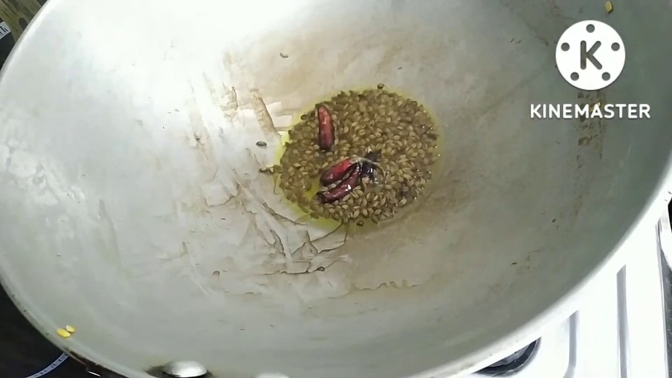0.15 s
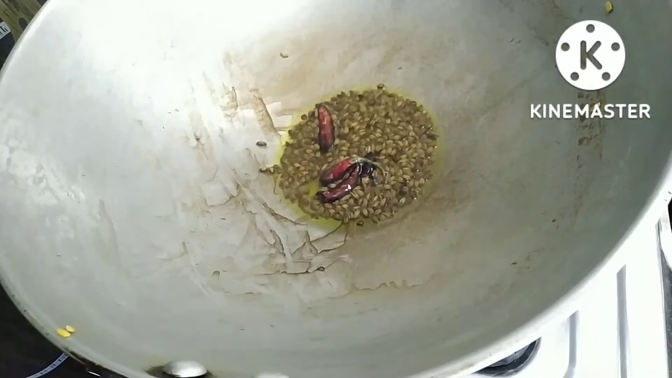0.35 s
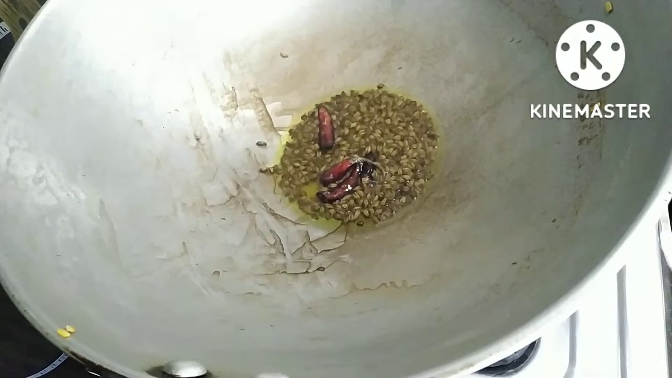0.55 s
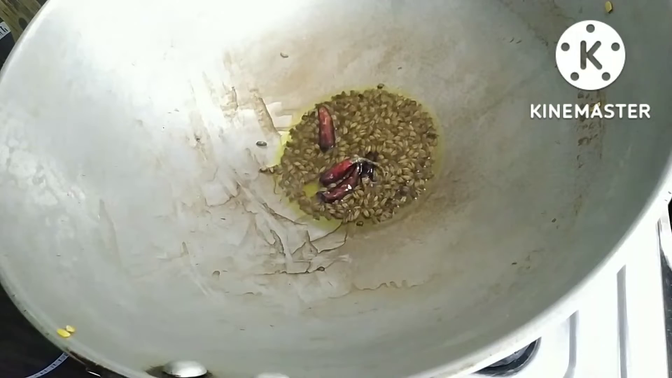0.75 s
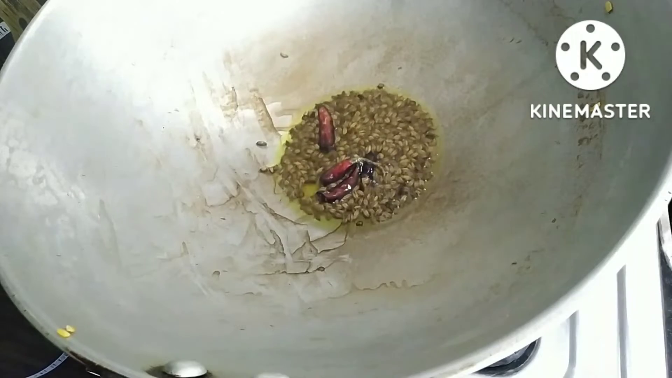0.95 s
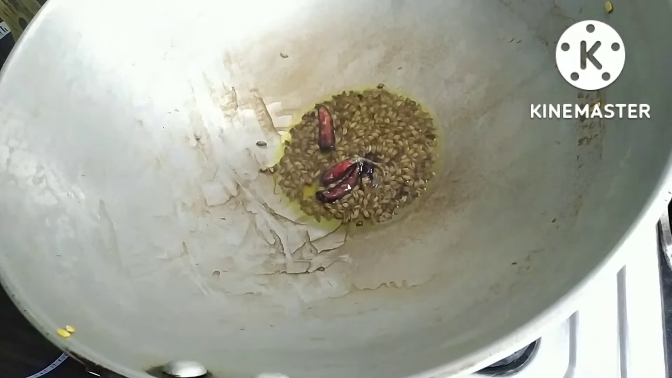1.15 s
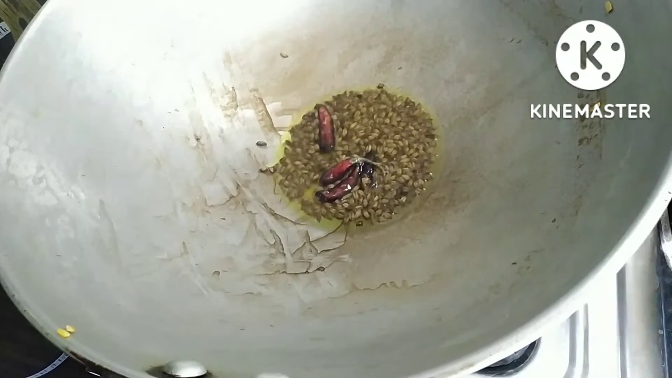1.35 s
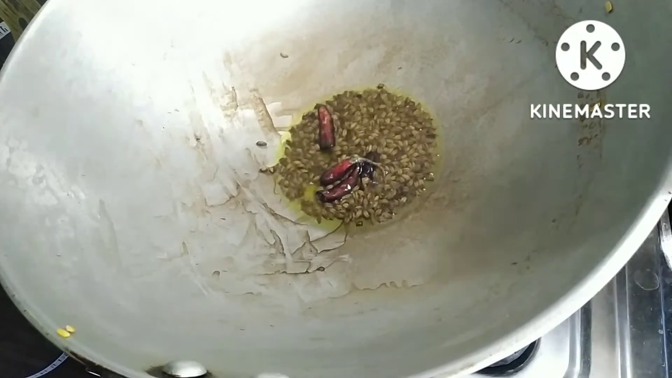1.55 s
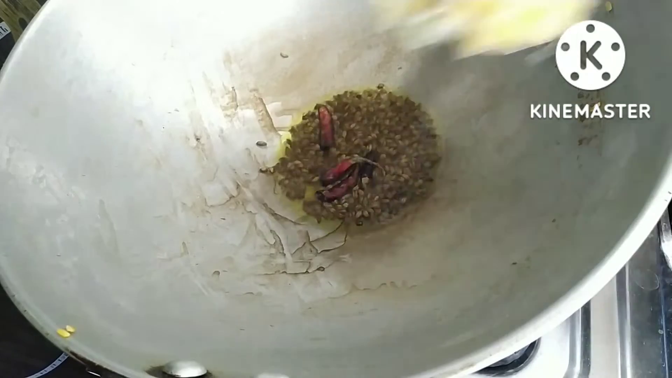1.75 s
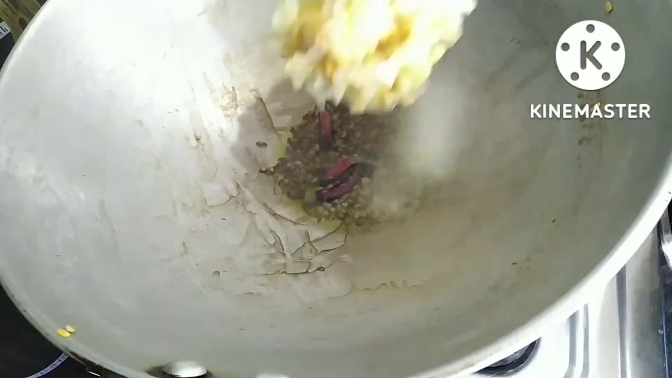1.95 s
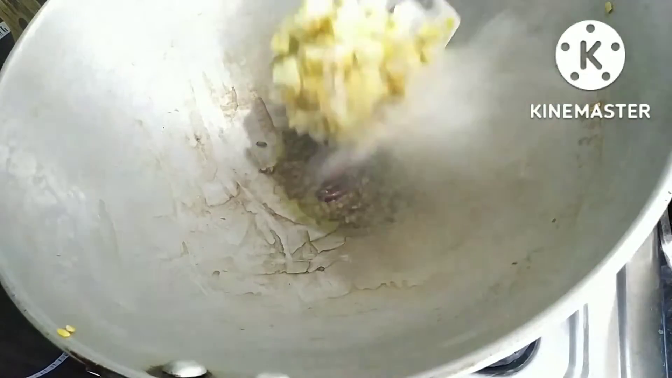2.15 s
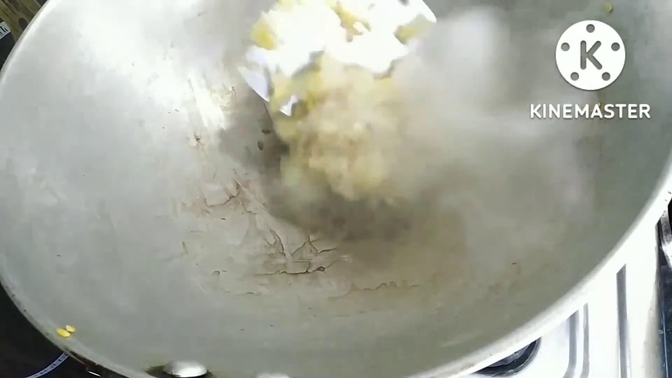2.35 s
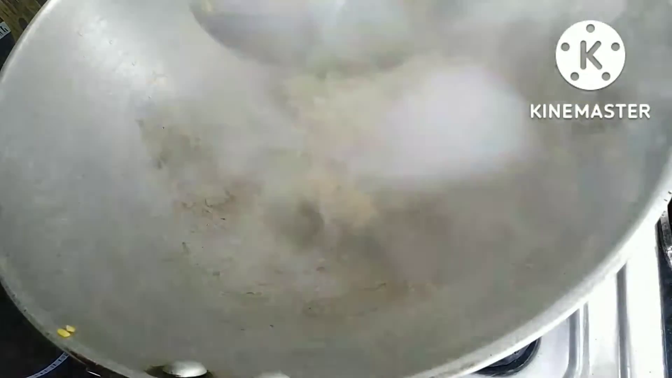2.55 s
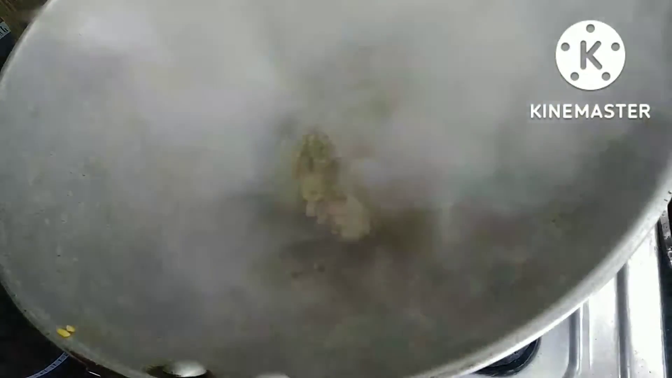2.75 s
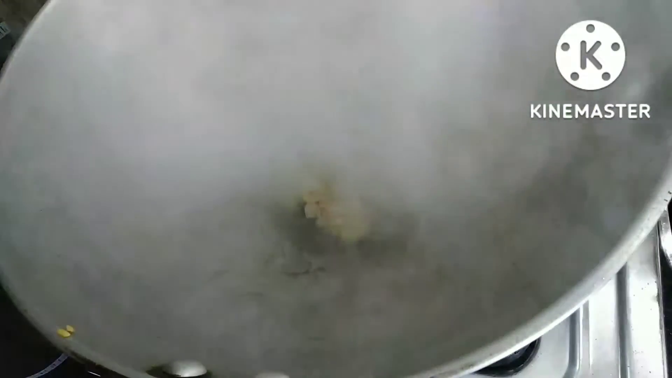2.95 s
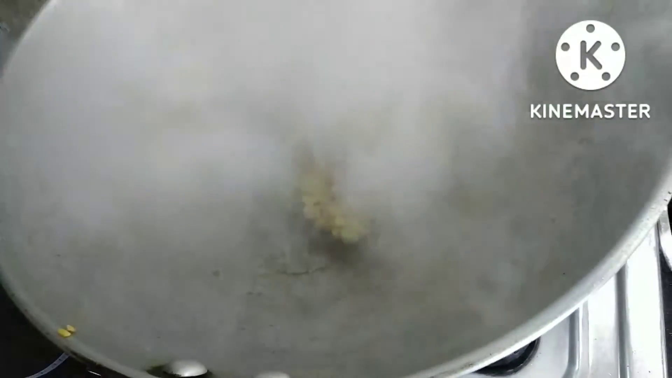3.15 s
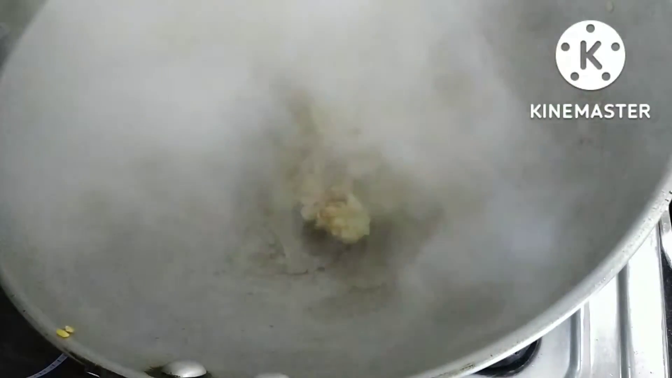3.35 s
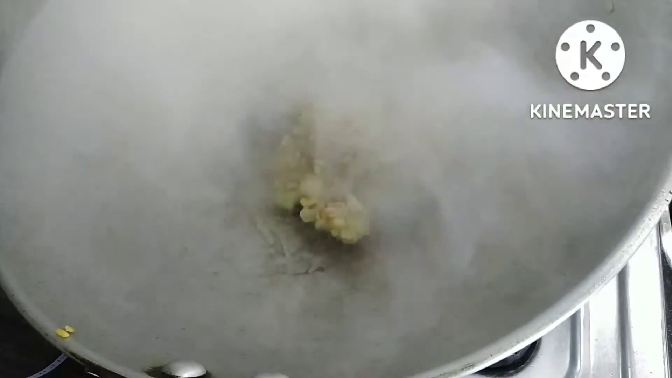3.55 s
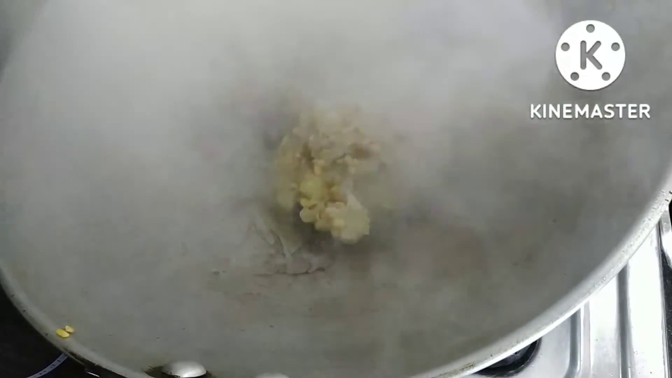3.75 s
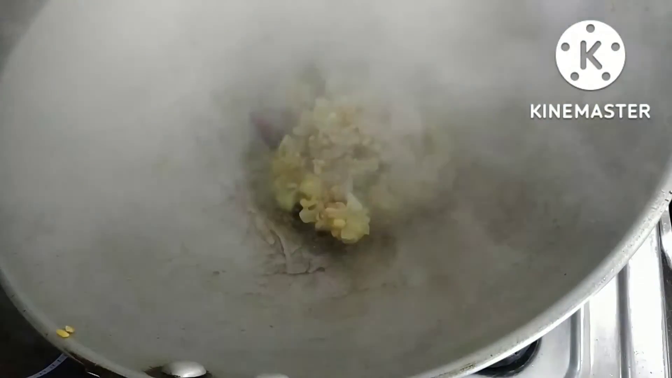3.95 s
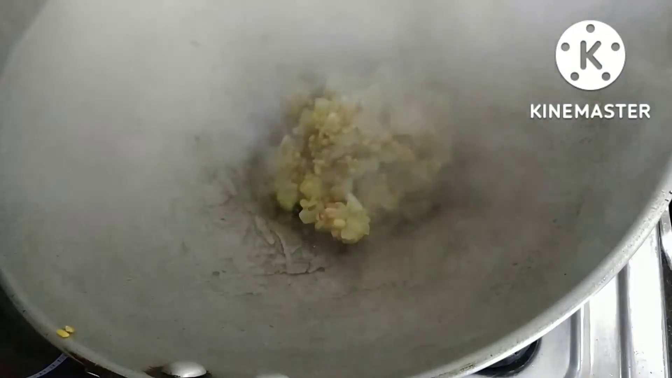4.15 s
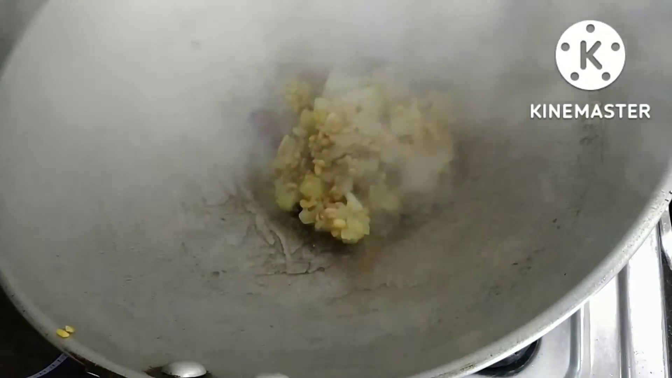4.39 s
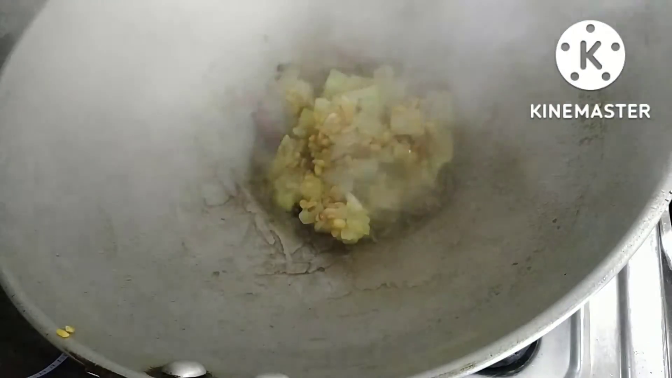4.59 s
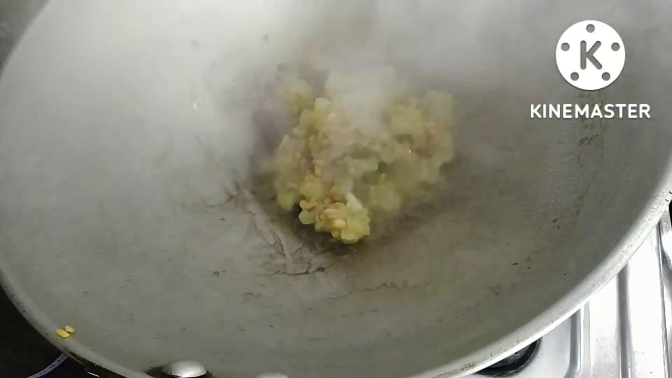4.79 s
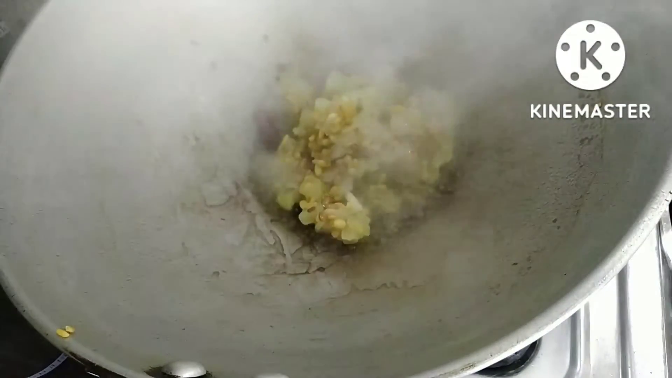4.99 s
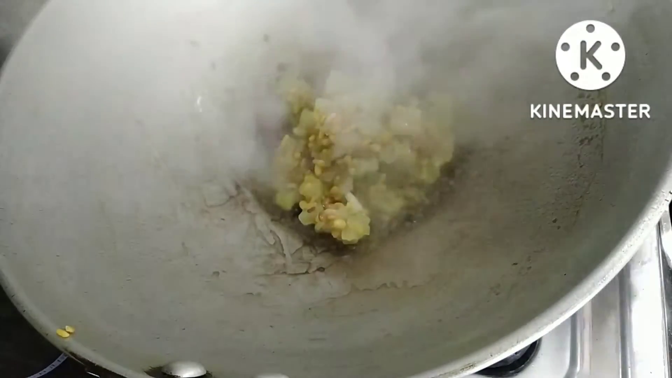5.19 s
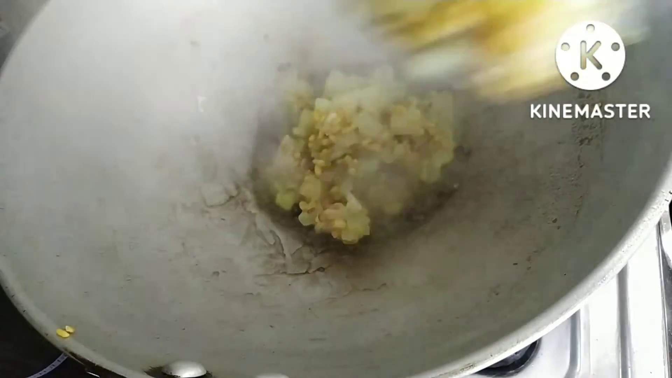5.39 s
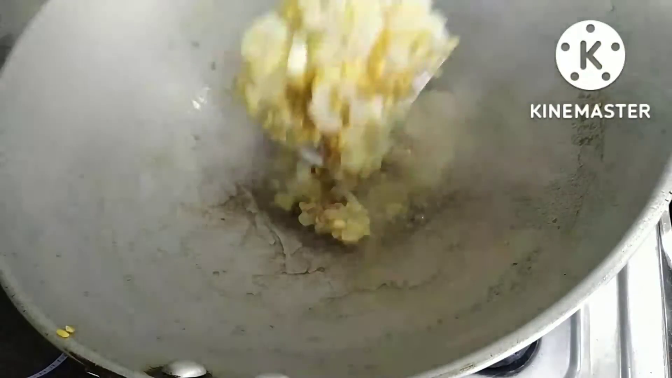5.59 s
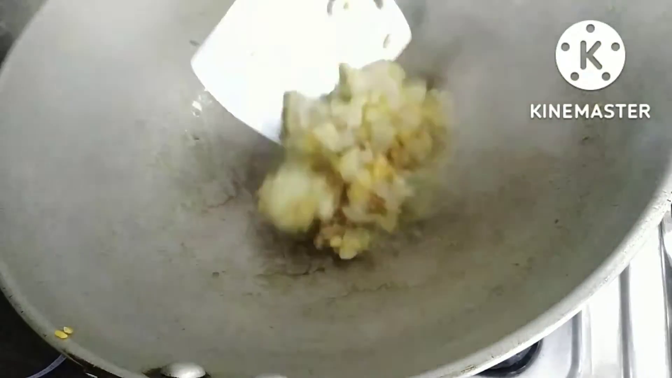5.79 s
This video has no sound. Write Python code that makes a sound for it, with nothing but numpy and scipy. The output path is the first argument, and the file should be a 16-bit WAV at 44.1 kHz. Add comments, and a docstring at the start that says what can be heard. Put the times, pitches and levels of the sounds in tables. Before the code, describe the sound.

A quiet kitchen opens with a dull, resonant knock of spoon and bowl at 0 s, over low burner rumble, a very faint hum and prickling spices in oil. Soft counter bumps and tiny, bright seed cracks follow from 0.35 s; short muffled spoon scrapes come at 0.6-0.8 s. At 0.87 s a utensil clacks on a metal pot, with a weaker rebound and ringing room, then faint touches until 1.3 s. Sparse seed ticks continue. At 2.0 s wet vegetables touch the oil and a bright, broad sizzle swells fast, strongest around 2.2-2.8 s, with heavy explosive pops and a puff of steam buffeting the right microphone near 2.7 s. From 3 s the hiss settles into dense steady frying, crackling with small blisters and scattered sharp spatter on the right, gradually thinning. Around 5.7 s another load lifts the sizzle modestly.

```python
"""Wet vegetables in a hot wok

Spices tick in hot oil in a metal wok; a spoon knocks and scrapes in a bowl, a utensil clacks on a pot, the kitchen rings.
At two seconds wet vegetables drop in: water flashes to steam, heard as a loud, bright sizzle that slowly settles.
The sizzle mixes noise with thousands of short rings; blisters crackle as brief tones, and sharp pushes of air make spatter.
Pots, bowls and knocks are sets of resonances set ringing; a burner rumble and a faint hum lie underneath."""
import sys
import numpy as np
from scipy import signal
from scipy.fft import rfft, irfft
from scipy.io import wavfile
from scipy.ndimage import uniform_filter1d

SR = 44100
rng = np.random.default_rng(int(sys.argv[2]) if len(sys.argv) > 2 else 0)


def dump(signal):
    """Clip the signal to [-1, 1] and save it as 16-bit WAV at the path in sys.argv[1]."""
    limited = np.clip(np.atleast_2d(signal).T, -1, 1)
    pcm = np.round(limited * 32767).astype(np.int16)
    wavfile.write(sys.argv[1], SR, pcm)


N = 257014
TIME = np.arange(N) / SR

# All table levels are relative; the functions set the final loudness.
# Hiss of bursting steam bubbles: f/Hz, level per Hz/dB
HISS_SPECTRUM = [(30, -40.5), (90, -20.5), (230, -29), (500, -22.5), (750, -19.5), (1250, -17), (1800, -13),
                 (3000, -6.5), (4300, -8), (6000, -4.5), (8000, 0.2), (10200, 0.44), (13000, -5),
                 (15500, -10)]
# Resonances of the bowl of the wok: f/Hz, width/Hz, level/dB
WOK_RESONANCES = [(730, 56, 5), (1230, 80, 4), (2590, 69, 1.5), (3280, 180, 3.7), (3880, 100, 2),
                  (4210, 80, 4.5), (4740, 74, 5), (4700, 76, 2), (5600, 56, 6.5), (6360, 89, 3.5),
                  (9740, 150, 3), (10700, 120, 3.5), (14480, 100, -1)]
# Wet food slides into the oil: t/s, flash level/dB, time to land/s, time it keeps sliding/s
FOOD_LOADS = [(2.021, -19, 0.077, .265), (2.201, -17.1, .3, .23), (5.658, -25.5, 0.075, .02)]
# Large blisters that burst in the heap: t/s, level/dB, f/Hz, t60/s (time to fade by 60 dB)
BIG_BLISTERS = [(3.58, -22, 900, 0.008), (4.03, -20, 630, 0.0095), (4.203, -21, 800, 0.007),
                (4.36, -23, 704, 0.009), (5.065, -21, 1610, 0.008)]
# Spectrum of one spatter pop: f/Hz for a droplet of size 1, level/dB
POP_SPECTRUM = [(25, -19), (55, 2), (120, 0.5), (300, -0.5), (700, -1), (1400, -1.5), (2500, -5.5),
                (5000, -12), (12000, -48)]
# Spatter pops that stand out: t/s, level/dB, droplet size (1 is usual, larger is duller)
BIG_POPS = [(2.41, -16, 1.2), (2.474, -15, 0.96), (2.662, 1, 0.75), (2.713, -3, 1.3), (2.749, -4, 1.6),
            (2.766, -11, 1.9), (2.807, -1, 1.1), (2.961, -14, 2), (3.101, -10.5, 2.4), (3.253, -12, 1.8),
            (3.268, -10, 0.77), (3.285, -6, 1), (3.372, -8, 0.81), (3.38, -7, 1.4), (3.394, -20, 0.65),
            (3.457, -16.5, 3.9), (3.478, -9, 0.87), (3.549, -6.5, 0.9), (3.723, -9, 1.2), (3.759, -19, 1.5),
            (3.817, -10, 0.93), (3.892, -13, 0.95), (3.909, -16, 1.8), (3.97, -8, 1.1), (4.041, -17, 1.8),
            (4.135, -13.5, 1.9), (4.193, -4.5, 0.59), (4.216, -15, 0.76), (4.275, -10, .6),
            (4.299, -8.5, 0.74), (4.365, -10.5, 1), (4.422, -15, 2.1), (4.444, -12, 0.82), (4.462, -18, .9),
            (4.542, -13, 0.69), (4.569, -14, 0.81), (4.589, -14, 0.73), (4.608, -15, 0.77),
            (4.685, -8, 0.72), (4.692, -2, 0.59), (4.749, -8, 0.7), (4.811, -16.5, 1.1), (4.847, -15, 0.66),
            (4.925, -21, 3.1), (5.024, -18, 0.94), (5.094, -26, 0.7), (5.25, -17, 1.2), (5.259, -13, 0.7),
            (5.292, -15.5, 1.2), (5.416, -15, 1.1), (5.453, -12, 1.1), (5.499, -13, 0.92),
            (5.524, -11, 1.05), (5.538, -10.5, 1.1), (5.547, -15, .8), (5.607, -18, 0.87)]
# Pockets of water burst into a short spit of droplets: middle t/s, level/dB, length/s
SPIT_BURSTS = [(2.121, -30.5, 0.056), (2.437, -34, 0.065), (3.242, -30, 0.17), (3.394, -31, 0.04),
               (3.563, -36, 0.13), (4.504, -40, 0.17), (3.982, -35, 0.045), (4.2, -35.5, 0.055),
               (4.686, -35, 0.029), (4.795, -41.5, 0.096), (5.27, -41, 0.038), (5.531, -35.5, 0.028)]
# Puffs of rising steam at the right microphone: middle t/s, level/dB, length/s
STEAM_PUFFS = [(2.202, -43, 0.062), (2.502, -36, 0.057), (2.73, -20, 0.045), (2.814, -41, 0.045)]
# Seeds cracking in the oil: t/s, level/dB, f/Hz, t60/s
SEED_CRACKS = [(0.3889, -19.5, 10600, 0.0016), (0.5057, -20, 10000, 0.0014), (0.6288, -23, 10200, 0.0018),
               (0.648, -30, 10000, 0.0019), (0.834, -21, 6800, 0.027), (1.1375, -34.5, 7300, 0.069),
               (1.199, -36, 7200, .04), (1.3288, -28, 12500, .005), (1.6388, -30.5, 10100, 0.011),
               (1.7006, -29, 8900, 0.014), (1.71, -33, 7500, 0.011), (1.8405, -29, 7500, 0.013)]
# The utensil touches, strikes and settles on the pot: t/s, level/dB, room level/dB, top of treble f/Hz
POT_CLACKS = [(0.613, -55, 7, 4500), (0.8698, -11.5, -3.5, 12500), (0.9029, -20.5, -19, 12500),
              (1.15, -47, -13, 1300), (1.174, -42.5, 2, 11000), (1.334, -51, -2, 1100)]
# Resonances of the pot and of the counter under it: f/Hz, width/Hz, level/dB
POT_RESONANCES = [(95, 65, -2.5), (331, 14, 1), (475, 56, 1.5), (716, 13, -2), (870, 36, 5), (930, 42, 6),
                  (1000, 25, 5.5), (1090, 110, 3), (1240, 110, 2), (1430, 90, -2), (1544, 22, 9),
                  (1665, 28, 15.5), (1710, 190, 10.5), (1963, 24, 11), (2170, 130, -2), (2570, 110, -1),
                  (2800, 20, 2), (2770, 100, -1), (3310, 70, -5), (3380, 22, 2), (3820, 60, -2),
                  (3950, 26, 8), (4010, 58, 7.5), (4340, 36, 0), (4450, 67, 2), (4640, 95, 4),
                  (5040, 88, -1), (5130, 33, 2), (5620, 60, -11), (7600, 2800, -3.5), (8700, 750, -1),
                  (9300, 500, -3), (10800, 900, -6), (11800, 600, -7)]
# Dull knocks of the spoon and its bowl: t/s, level/dB, room level/dB
SPOON_KNOCKS = [(0.0, -27.5, 3), (0.025, -39, -4)]
# Resonances of a knock, the narrow ones ringing on: f/Hz, width/Hz, level/dB
KNOCK_RESONANCES = [(113, 12, 7.5), (199, 6.8, 5), (300, 81, 8), (320.3, 8.3, 16.5), (432, 7.3, 11.5),
                    (543, 5.8, 7.5), (689, 9.7, 11), (730, 6.8, 8.5), (818, 4.7, 12), (900, 1100, -15),
                    (1034, 7.1, 7), (1155, 5.5, 6), (1205, 6.6, 5), (1348, 5, 8.5), (1561, 3.2, -6),
                    (1776, 9.2, -7), (2060, 50, -2.5), (2620, 640, -12.5), (8850, 9700, -17.5)]
# Soft bumps on the counter: t/s, level/dB, f/Hz, t60/s
COUNTER_BUMPS = [(0.351, -32.5, 156, 0.069), (0.359, -43, 205, 0.06), (0.39, -40.5, 148, 0.1),
                 (0.506, -46, 120, 0.092), (0.667, -46, 111, 0.16)]
# Strokes of the spoon in a bowl: t/s, level/dB, fade time constant/s
SPOON_STROKES = [(0.612, -54, 0.023), (0.664, -48, 0.014), (0.721, -48, 0.012), (0.76, -58, 0.02)]
# Dull rasp of the strokes: f/Hz, level per Hz/dB
RASP_SPECTRUM = [(50, -20), (130, -5), (370, 7), (560, -12), (780, -2), (1200, -12), (1850, -14),
                 (3000, -13), (8000, -26), (15000, -36)]
# Burner rumble and faint fizz of the spices: f/Hz, level per Hz/dB
STOVE_SPECTRUM = [(20, -50), (35, -40), (62, -1), (105, -6), (160, -14), (230, -24), (290, -22),
                  (620, -21.5), (1400, -26.5), (2750, -24), (3250, -21), (3650, -27.5), (4600, -22.5),
                  (5250, -26), (6300, -18), (7460, -18), (8700, -19), (10000, -15.5), (12000, -21.5),
                  (15500, -27)]
# Faint steady hum in the kitchen: f/Hz, level/dB
HUM_TONES = [(226.1, -77.5), (522.2, -79.5), (640.6, -84), (710.6, -80), (872.1, -91)]
# How long the kitchen rings: f/Hz, t60/s
KITCHEN_DECAY = [(150, 0.75), (530, 0.76), (1400, 0.58), (3700, 0.69), (9700, 0.57), (15000, 0.26)]

# The heap fries on from first contact: start, time to spread over the oil, relative level, slow cooling
CONTACT_S, SPREAD_S, FRY_DB, COOLING_DB_PER_S = 2.009, 0.058, -18.5, 0.2248
# The first drops to touch the oil, against the whole heap
FIRST_DROPS_DB = -15.5
# The water on each load flashes off with this time constant
FLASH_S = 0.29
# A harder boil throws bigger, lower bubbles: bass boost at the frying level, and its growth per dB of boil
LOW_END_DB, LOW_END_PER_DB = -1.85, 2.5
# Relative spatter at the frying level, its growth per dB of boil, and its fall as the food dries
SPRAY_DB, SPRAY_PER_DB, DRYING_DB_PER_S = -33.5, 2, 2.5
# Bubble rings: range of pitch, cycles to fade by 60 dB, spread of their sizes
BUBBLE_HZ = (1500, 15700)
BUBBLE_CYCLES, BUBBLE_SIZE_DB = 210, 1
# The left microphone hears the heap later: delay, and its spread across the heap
LAG_S, LAG_SPREAD_S = 0.0001, 0.00004


def sizzle(jet_share=0.88, flutter_db=0.31, level_db=4.0, right_db=0.94, low_end_rise_db_per_s=0.2):
    """Thousands of steam bubbles burst each second over a jet hiss, coloured by the bowl of the wok."""
    jet = rng.standard_normal((2, N))
    source = np.sqrt(1 - jet_share) * bubbles() + np.sqrt(jet_share) * jet
    hz, t, z = signal.stft(coloured(source, HISS_SPECTRUM), SR, nperseg=1024, noverlap=768)
    bowl_db = sum(db / (1 + (2 * (hz - f) / width) ** 2) for f, width, db in WOK_RESONANCES)

    boil = boil_db()
    bass_db = LOW_END_DB + LOW_END_PER_DB * np.maximum(boil - FRY_DB, -6)
    bass_db = bass_db + low_end_rise_db_per_s * (TIME - CONTACT_S)
    bass_share = read([(200, 1.6), (1200, 0.69), (3500, 0.16), (8000, 0.014)], hz)

    # the sound flickers in small patches of pitch and time, most in parts of the treble
    patches = uniform_filter1d(rng.standard_normal(z.shape[1:]), size=2, axis=0)
    patches = evened(uniform_filter1d(patches, size=12, axis=1))
    depth_db = read([(1000, .8), (2500, 1.8), (4200, 3.6), (7000, 1.8), (10000, 1.5), (14000, 3.2)], hz)
    flicker_db = patches * depth_db[:, None]

    z = z * gain_of(bowl_db[:, None] + bass_share[:, None] * np.interp(t, TIME, bass_db) + flicker_db)
    hiss = signal.istft(z, SR, nperseg=1024, noverlap=768)[1][:, :N]
    # pockets of steam let go unevenly, on both sides of the heap
    flutter = flutter_db * (drift(90) + np.array([drift(110), drift(130)]))
    balance_db = np.array([[-right_db], [right_db]]) / 2
    return hiss * gain_of(level_db + boil + flutter + balance_db)


def bubbles(count=18000, size=512):
    """Tiny bubbles, each a sharp start and a short, cut-off ring with its own pitch and place in the heap."""
    when, pitch, big, place = rng.random((4, count, 1))
    hz = BUBBLE_HZ[0] + pitch * (BUBBLE_HZ[1] - BUBBLE_HZ[0])
    t = np.arange(size) / SR
    strength = np.sqrt(hz) * gain_of(BUBBLE_SIZE_DB * np.minimum(-np.log(1 - big), 4))
    ring = strength * np.exp(-np.log(1000) * t * hz / BUBBLE_CYCLES)
    start = ((CONTACT_S + when * (N / SR - CONTACT_S)) * SR).astype(int)
    at = (start + np.arange(size)).ravel()
    left_lag = LAG_S + LAG_SPREAD_S * (2 * place - 1)
    ears = []
    for lag in (left_lag, 0):
        wave = ring * np.sin(np.float32(2 * np.pi * hz * (t - lag)))
        ears.append(np.bincount(at, wave.ravel(), N)[:N])
    return evened(np.array(ears))


def boil_db():
    """How hard the water boils: each load swells, holds and flashes off, over the steady frying of the heap."""
    age = TIME - CONTACT_S
    touch = np.clip(age / 0.004, 1e-5, 1)
    spread = np.minimum(gain_of(FIRST_DROPS_DB) + (np.maximum(age, 0) / SPREAD_S) ** 2, 1)
    power = (touch * spread * gain_of(FRY_DB - COOLING_DB_PER_S * age)) ** 2
    for s, db, land_s, slide_s in FOOD_LOADS:
        swell = np.clip((TIME - s) / land_s, 0, 1) ** 3
        flash_off = np.exp(-np.maximum(TIME - s - land_s - slide_s, 0) / FLASH_S)
        power = power + gain_of(db) ** 2 * swell * flash_off
    return 10 * np.log10(power)


def blisters(tilt_db_per_octave=6.0, per_s=420, lowest_hz=520, highest_hz=6000, cycles=9, size_db=4,
             level_db=-17, right_db=-5, count=24):
    """Water blisters burst in the heap as brief rings: many small ones crackle, a few large ones plop."""
    out, t = np.zeros((2, N)), np.arange(1024) / SR
    for hz in np.geomspace(lowest_hz, highest_hz, count):
        train = random_sizes(size_db, 3) * (rng.random(N) < per_s / count / SR)
        tilt = gain_of(tilt_db_per_octave * np.log2(hz / lowest_hz))
        ring = tilt * np.sin(2 * np.pi * hz * t) * gain_of(-60 * t * hz / cycles)
        place = rng.random(N) * np.pi / 2  # from left to right
        placed = train * np.array([np.cos(place), np.sin(place)])
        out += signal.oaconvolve(placed, ring[None], axes=1)[:, :N]
    spread = np.clip((TIME - CONTACT_S) / SPREAD_S, 0, 1)
    out = evened(out) * gain_of(level_db + boil_db()) * spread
    for s, db, hz, t60 in BIG_BLISTERS:
        plop = gain_of(db - 60 * t / t60) * np.sin(2 * np.pi * hz * t)
        add(out, s, plop * gain_of([[0], [right_db]]))
    return out


def spatter(pops_per_s=800, size_db=2.0, level_db=5.5, big_db=3.5, left_db=-22):
    """Tiny droplets pop near the right microphone; the harder the boil, the louder and denser they come."""
    pop = pop_of(1)
    steady_db = SPRAY_DB + SPRAY_PER_DB * (boil_db() - FRY_DB) - DRYING_DB_PER_S * (TIME - CONTACT_S)
    spits = sum(gain_of(db) ** 2 * hump(s, length) for s, db, length in SPIT_BURSTS)
    spray_db = 10 * np.log10(gain_of(steady_db) ** 2 + spits)
    # pops_per_s holds where the spray is at -38 dB
    rate = pops_per_s * gain_of(np.clip(spray_db + 38, -8, 16))
    starts = rng.random(N) < rate / SR
    train = evened(random_sizes(size_db, 4) * starts / np.sqrt(rate))
    spray = signal.oaconvolve(train, pop / np.linalg.norm(pop))[:N] * gain_of(level_db + spray_db)
    for s, db, droplet in BIG_POPS:
        big = pop_of(droplet)
        add(spray, s, gain_of(db + big_db) * big / big.max())
    spray = signal.sosfilt(signal.butter(2, 35, "high", fs=SR, output="sos"), spray)
    return spray * gain_of([[left_db], [0]])


def pop_of(droplet):
    """One pop: a sharp one-sided push of air, duller from a larger droplet."""
    hz = abs(np.fft.fftfreq(4096, 1 / SR))
    log_gain = np.log(gain_of(read(POP_SPECTRUM, droplet * hz)))
    # minimum phase: the energy comes as early as this spectrum allows
    return np.fft.ifft(np.exp(np.conj(signal.hilbert(log_gain)))).real[:2048]


def steam(left_db=-15):
    """Puffs of rising steam buffet the right microphone: short swells of low, rumbling noise."""
    push = sum(gain_of(db) * hump(s, length) for s, db, length in STEAM_PUFFS)
    rumble = coloured(rng.standard_normal(N), [(20, -14), (50, 0), (120, -6), (300, -15), (1500, -37)])
    return push * rumble * gain_of([[left_db], [0]])


def seeds(width=0.19, room_db=-9, bowl_db=-19, bowl_t60=0.025, snap_low_hz=3000):
    """Each seed splits with a short, bright burst of noise and a fainter flutter of noise in the wok."""
    out, t, hz = np.zeros((2, N)), np.arange(2048) / SR, np.fft.rfftfreq(2048, 1 / SR)
    for s, db, pitch_hz, t60 in SEED_CRACKS:
        band = 1 / (1 + (np.log((hz + 1) / pitch_hz) / width) ** 2)
        crack, flutter = irfft(rfft(rng.standard_normal((2, 2, 2048))) * band)
        # a seed is too small to radiate much bass
        radiation = 1j * hz / (snap_low_hz + 1j * hz)
        crack = irfft(rfft(crack * gain_of(-60 * t / t60)) * radiation)
        snap = crack / abs(crack).max(axis=1, keepdims=True)
        snap = snap + flutter / abs(flutter).max() * gain_of(bowl_db - 60 * t / bowl_t60)
        add(out, s, gain_of(db) * snap)
    return out + gain_of(room_db) * kitchen(out)


def clack(contact_t60=0.043, room_db=-1, left_db=2, level_db=3):
    """A utensil hits a pot, a little to the left, and rattles to rest: each blow rings the pot's resonances."""
    near, far = np.zeros((2, N)), np.zeros((2, N))
    for s, db, wet_db, top_hz in POT_CLACKS:
        blow = gain_of(db + level_db) * strike(POT_RESONANCES, contact_t60, top_hz)
        add(near, s, blow)
        add(far, s, gain_of(wet_db + room_db) * blow)
    return (near + kitchen(far)) * gain_of([[left_db], [0]])


def knocks(contact_t60=0.026, level_db=7, right_db=-2, rise_s=0.011, bump_room_db=-3):
    """Spoon and bowl ring dull resonances; soft bumps on the counter are low, fading tones."""
    near, far, t = np.zeros((2, N)), np.zeros((2, N)), np.arange(SR // 3) / SR
    for s, db, room_db in SPOON_KNOCKS:
        blow = gain_of(db + level_db) * strike(KNOCK_RESONANCES, contact_t60)
        add(near, s, blow)
        add(far, s, gain_of(room_db) * blow)
    for s, db, hz, t60 in COUNTER_BUMPS:
        bump = gain_of(db - 60 * t / t60) * np.sin(2 * np.pi * hz * t) * np.minimum(t / rise_s, 1)
        add(near, s, bump)
        add(far, s, gain_of(bump_room_db) * bump)
    return near * gain_of([[0], [right_db]]) + kitchen(far)


def strike(modes, t60, top_hz=12500, noise_share=0.2, spot_db=0.5, size=32768):
    """A sharp push and contact noise ring the resonances, a little differently at each microphone."""
    t, hz = np.arange(size) / SR, np.fft.rfftfreq(size, 1 / SR)
    contact = rng.standard_normal((2, size)) * gain_of(-60 * t / t60) * np.minimum(t / 0.00033, 1)
    push = np.exp(-2j * np.pi * hz * 0.0007)  # a click 0.7 ms in
    force = np.sqrt(noise_share) * evened(rfft(contact)) + np.sqrt(1 - noise_share) * push
    body = 0
    for f, width, db in modes:
        resonance = 1j * hz * width / (f ** 2 - hz ** 2 + 1j * hz * width)
        body = body + gain_of(db + spot_db * rng.standard_normal()) * resonance
    blow = irfft(force * body / np.sqrt(1 + (hz / top_hz) ** 10))
    # same energy as one millisecond at rms 1
    return blow / np.linalg.norm(blow, axis=1, keepdims=True) * np.sqrt(SR * 0.001)


def scrape(slips_per_s=900, size_db=3, rise_s=0.004, room_db=-3, right_db=-2):
    """The spoon scrapes in a bowl: short strokes, each a run of tiny slips."""
    stroke = np.zeros(N)
    for s, db, fade_s in SPOON_STROKES:
        rise = np.clip((TIME - s) / rise_s, 0, 1)
        stroke += gain_of(db) * rise * np.exp(-np.maximum(TIME - s, 0) / fade_s)
    near = stroke * coloured(random_ticks(slips_per_s, size_db), RASP_SPECTRUM)
    return near * gain_of([[0], [right_db]]) + gain_of(room_db) * kitchen(near[0])


def prickle(per_s=90, size_db=4, level_db=-65):
    """Tiny bubbles prick around the spices as random ticks until the food covers them."""
    ticks = random_ticks(per_s, size_db)
    bright = coloured(ticks, [(500, -30), (3000, -3), (7500, -1), (10500, -3), (15000, -11)])
    return gain_of(level_db) * bright * (TIME < CONTACT_S)


def stove(shared=0.54, level_db=-56, hum_db=-1):
    """Burner rumble and spice fizz are one noise, easing off over two seconds; steady tones hum."""
    noise = rng.standard_normal((3, N))
    fade_db = np.interp(TIME, [0, 0.7, 1.4, 2], [3.8, 2.6, 1.5, 0.81])
    # the third noise is heard by both microphones
    bed = coloured(noise[:2] + shared * noise[2], STOVE_SPECTRUM)
    bed = gain_of(level_db + fade_db + 0.5 * drift(29.5)) * bed
    hum = np.zeros(N)
    for hz, db in HUM_TONES:
        phase = 2 * np.pi * hz * TIME + 0.5 * drift(11)
        hum += gain_of(db + hum_db) * np.sqrt(2) * np.sin(phase)
    return bed + hum


def kitchen(x):
    """Reverberation: dense random reflections, each band dying at its own speed."""
    hz, t, z = signal.stft(rng.standard_normal((2, SR)), SR, nperseg=256)
    decay = gain_of(-60 * t / read(KITCHEN_DECAY, hz)[:, None])
    tail = signal.istft(z * decay, SR, nperseg=256)[1]
    tail *= np.clip(np.arange(tail.shape[1]) / SR / 0.0018, 0, 1)
    return signal.fftconvolve(np.atleast_2d(x), tail / np.linalg.norm(tail[0]), axes=1)[:, :N]


def gain_of(db):
    """Turns decibels into a factor."""
    return 10 ** (np.asarray(db) / 20)


def evened(x):
    """Scales x to rms 1."""
    return x / np.sqrt(np.mean(x ** 2) + 1e-20)


def read(points, hz):
    """Reads a table of frequencies and values on a log-frequency axis."""
    f, value = np.transpose(points)
    return np.interp(np.log(hz + 1), np.log(f + 1), value)


def coloured(x, points):
    """Gives x a spectrum, at rms 1."""
    gain = gain_of(read(points, np.fft.rfftfreq(N, 1 / SR)))
    return evened(irfft(rfft(x) * gain, N))


def drift(per_s):
    """A random wander of rms 1: per_s random points each second, joined by straight lines."""
    knots = np.arange(0, 7, 1 / per_s)
    return evened(np.interp(TIME, knots, rng.standard_normal(len(knots))))


def hump(s, length):
    """A smooth rise and fall around time s."""
    return np.exp(-(2 * (TIME - s) / length) ** 2)


def random_sizes(size_db, most):
    """Random strengths, mostly small with a few large."""
    return gain_of(size_db * np.minimum(rng.exponential(1, N), most))


def random_ticks(per_s, size_db):
    """Ticks of random strength at random moments, in time on both sides."""
    return rng.standard_normal((2, N)) * random_sizes(size_db, 3) * (rng.random(N) < per_s / SR)


def add(mix, s, sound):
    """Mixes a sound in at time s."""
    part = mix[..., max(round(s * SR), 0):][..., :sound.shape[-1]]
    part += sound[..., :part.shape[-1]]


def scene():
    """Everything at the stove, added together."""
    cooking = sizzle() + blisters() + spatter() + steam() + seeds()
    utensils = clack() + knocks() + scrape()
    return cooking + utensils + prickle() + stove()


def record(dry):
    """Rounds off the highest peaks near full scale, then limits the deep bass and the top treble."""
    limited = dry / (1 + dry ** 8) ** (1 / 8)
    limited = signal.sosfilt(signal.butter(3, 32, "high", fs=SR, output="sos"), limited)
    lowpass = signal.firwin(401, 15700, window=("kaiser", 7), fs=SR)
    return signal.oaconvolve(limited, lowpass[None], "same")


dry = scene()
out = record(dry)
dump(out)
```